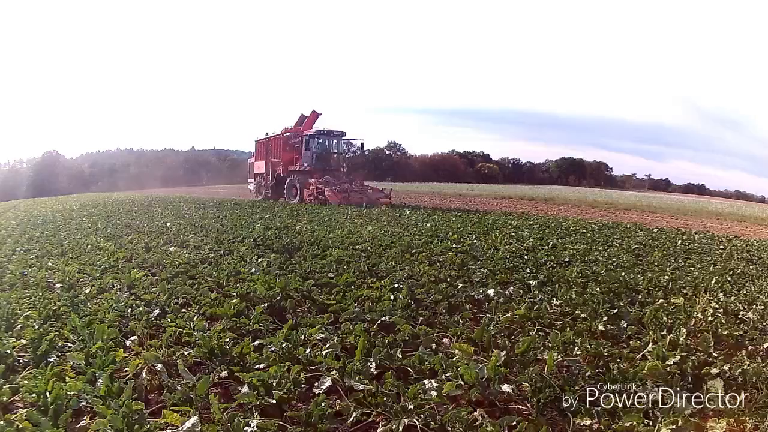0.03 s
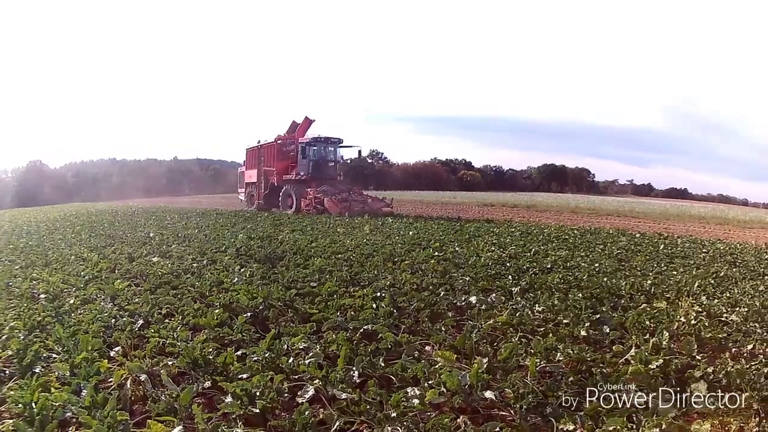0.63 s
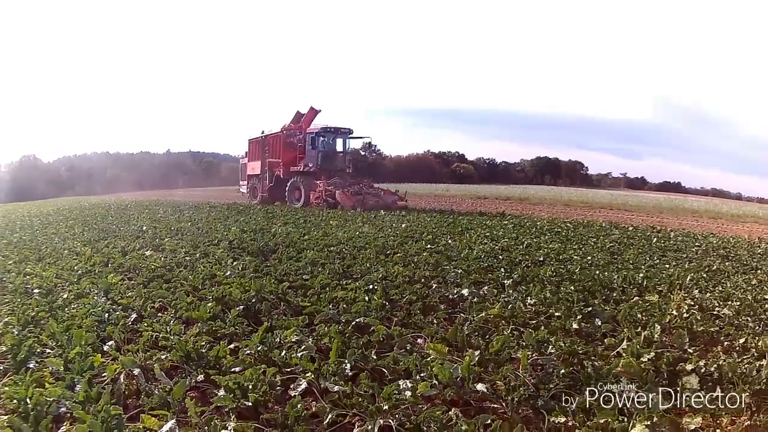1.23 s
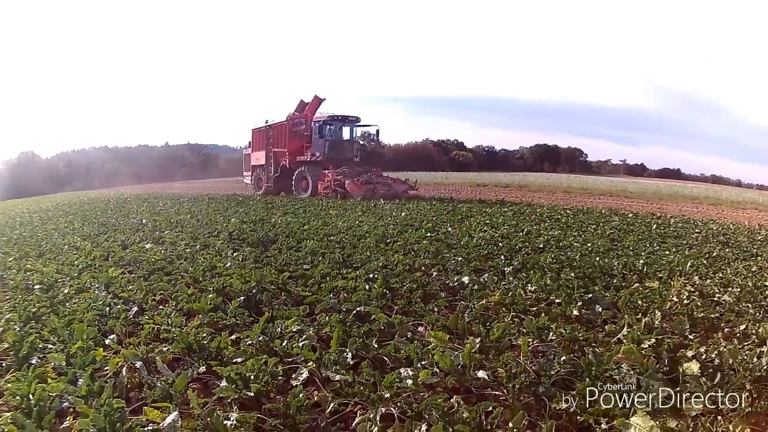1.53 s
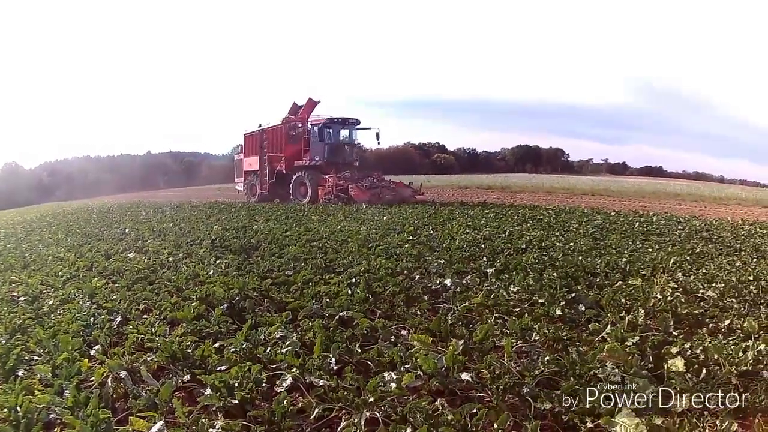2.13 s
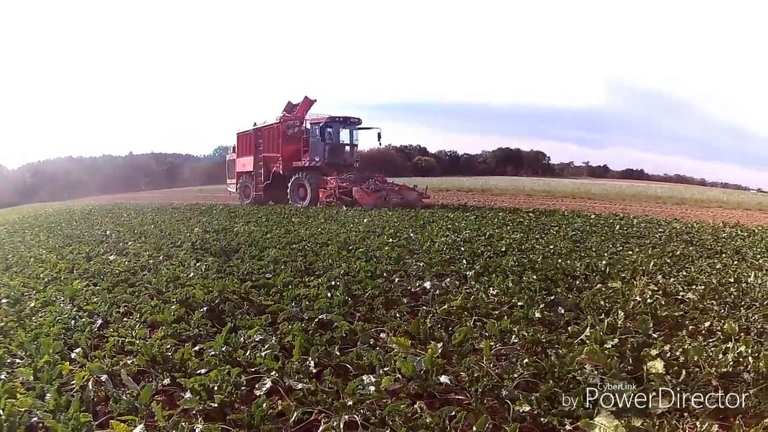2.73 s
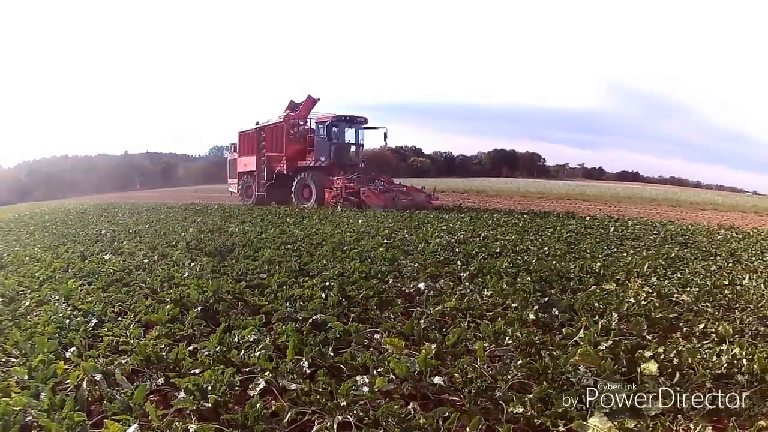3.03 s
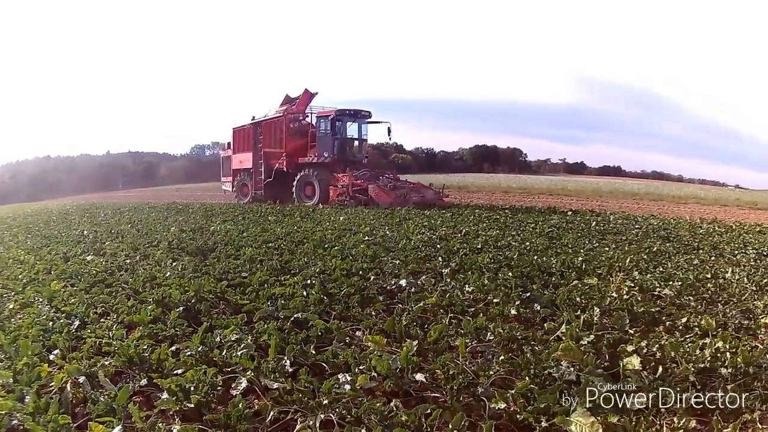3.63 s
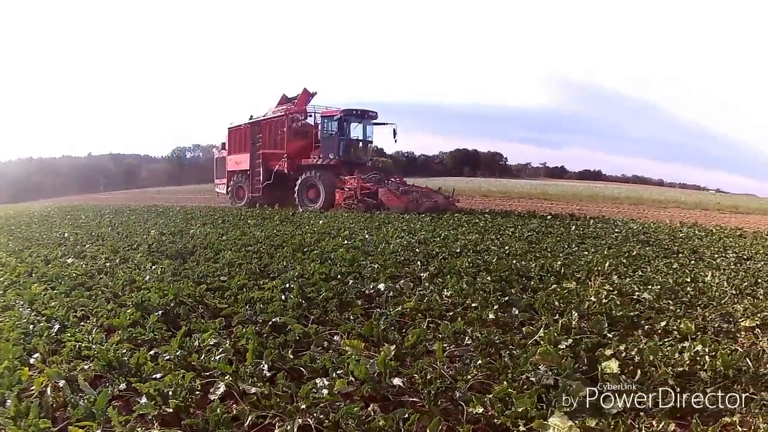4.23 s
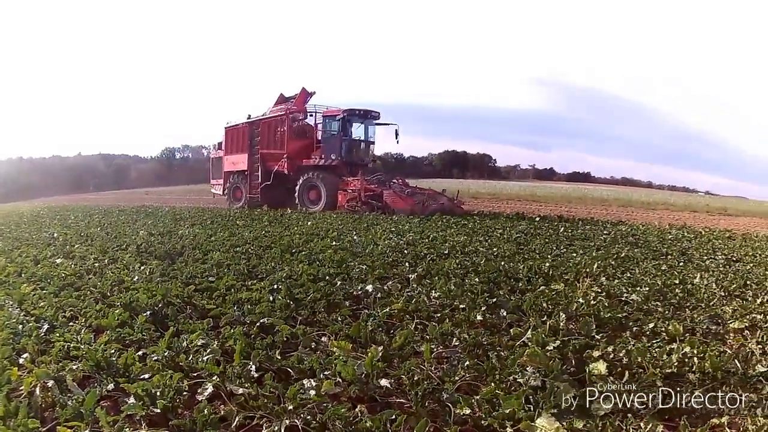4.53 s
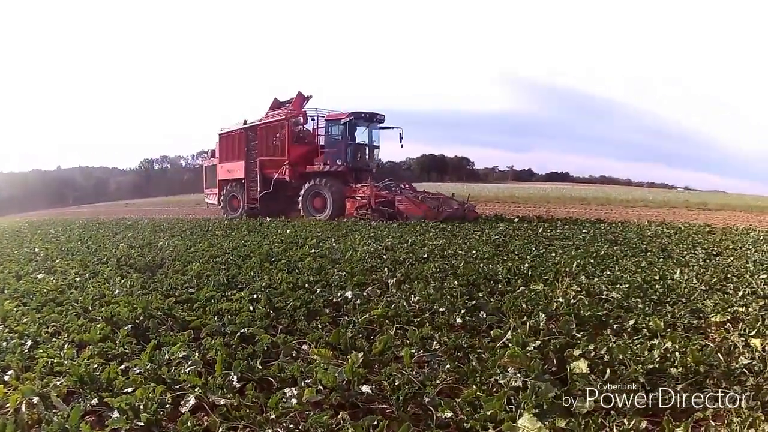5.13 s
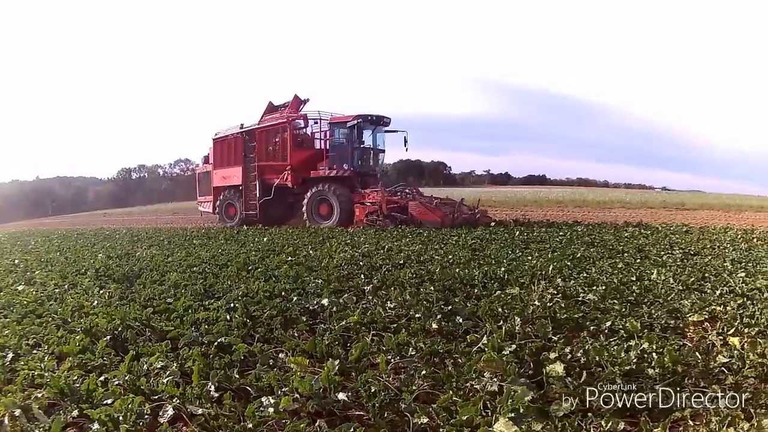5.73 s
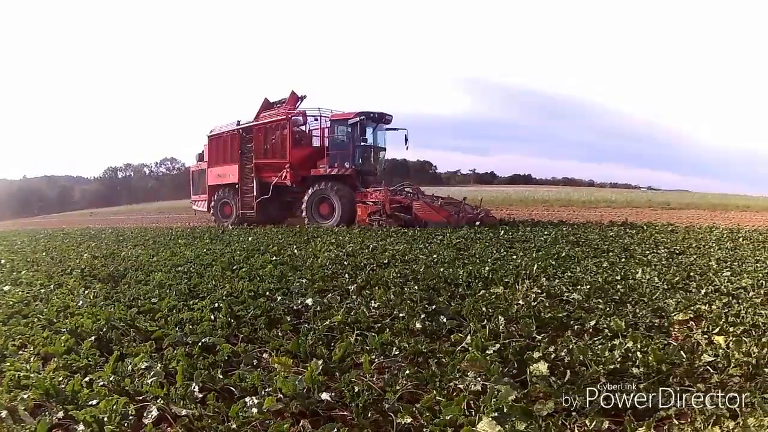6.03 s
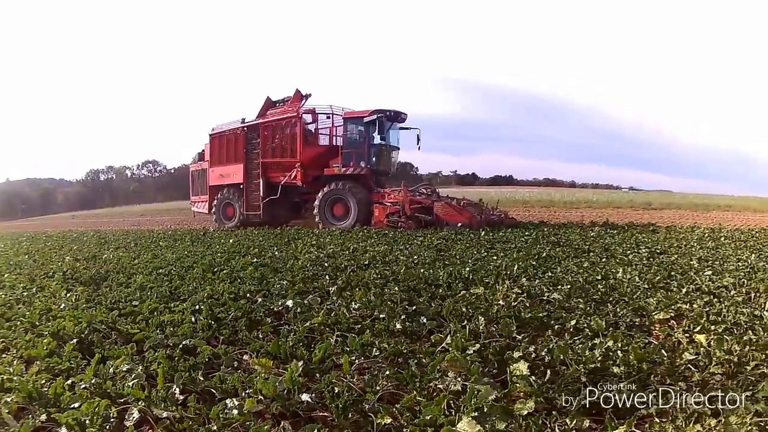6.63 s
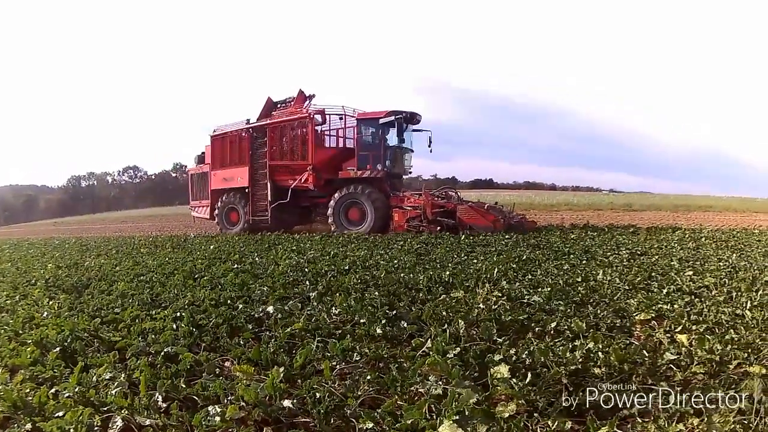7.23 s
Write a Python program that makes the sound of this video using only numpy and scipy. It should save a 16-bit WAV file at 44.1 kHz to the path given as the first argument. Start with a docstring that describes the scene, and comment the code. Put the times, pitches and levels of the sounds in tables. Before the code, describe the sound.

A beet harvester draws nearer, its diesel droning over churning and rattling machinery, with early microphone handling bumps and light wind.

```python
"""Beet harvester drawing near

A beet harvester works its way across a field towards a small hand-held camera. Its diesel drones,
pump and gears whine, beets churn through the lifting gear and stones clink in the rattling sieve chains.
Early on, fingers click, rub and bump on the camera case; light wind rumbles on the microphone."""
import sys
import numpy as np
from scipy import signal
from scipy.fft import rfft, irfft, next_fast_len
from scipy.io import wavfile

SR = 44100
rng = np.random.default_rng(int(sys.argv[2]) if len(sys.argv) > 2 else 0)


def inscribe(sig):
    """Save sig as 16-bit PCM at rate SR to the path in sys.argv[1].

    A 1-D sig is mono; a 2-D sig holds one channel per row.
    Samples are clipped to [-1, 1] before scaling.
    """
    pcm = np.round(np.clip(np.atleast_2d(sig).T, -1, 1) * 32767)
    wavfile.write(sys.argv[1], SR, pcm.astype(np.int16))


N = 321489
TIME = np.arange(N) / SR
START_S = 0.1035   # silence until here


def from_db(db):
    """Decibels to gain."""
    return 10 ** (np.asarray(db) / 20)


def rms_one(x):
    """Scale to unit rms."""
    return x / np.sqrt(np.mean(x ** 2) + 1e-20)


def automation(points):
    """Join (time, value) breakpoints with straight lines, at every sample."""
    return np.interp(TIME, *np.transpose(points))


def butter(x, hz, kind, order=2):
    """Causal low- or high-pass."""
    return signal.sosfilt(signal.butter(order, hz, kind, fs=SR, output="sos"), x + 1e-18)


def drift(rate_hz):
    """Smooth random modulation of unit rms, rolling off above the given rate."""
    hop, settle = 40, 2000
    pole = np.exp(-2 * np.pi * rate_hz * hop / SR)
    noise = rng.standard_normal(N // hop + settle + 2)
    slow = signal.lfilter([1], [1, -2 * pole, pole * pole], noise)[settle:]
    return np.interp(np.arange(N) / hop, np.arange(len(slow)), rms_one(slow))


def coloured(x, spectrum):
    """Shape a steady excitation with an EQ curve; unit rms."""
    hz, level_db = np.transpose(spectrum)
    size = next_fast_len(N)
    bins_hz = np.maximum(np.arange(size // 2 + 1) * SR / size, 1)
    gain = from_db(np.interp(np.log(bins_hz), np.log(hz), level_db, left=-100, right=-100))
    return rms_one(irfft(rfft(x, size) * gain, size)[:N])


def ring(x, hz, t60):
    """One resonance: a unit click sets off a decaying sine of height 1."""
    r, w = from_db(-60 / (t60 * SR)), 2 * np.pi * hz / SR
    return signal.lfilter([0, np.sin(w)], [1, -2 * r * np.cos(w), r * r], x + 1e-18)


def angle(hz):
    """Phase of something turning at a changing rate."""
    return 2 * np.pi * np.cumsum(hz) / SR + rng.uniform(0, 2 * np.pi)


def tone(hz, level_db, fade_db=0.0, fade_hz=2.4):
    """A machine tone; fade_db lets it swell and fade as the air moves over the field."""
    fading = from_db(fade_db * 2 * np.tanh(drift(fade_hz) / 2))   # swells stay bounded
    return np.sqrt(2) * from_db(level_db) * rms_one(fading) * np.sin(angle(hz))


def impacts(per_s, spread_db):
    """A random hail of contacts of uneven strength; unit rms."""
    sizes = from_db(spread_db * np.minimum(rng.exponential(1, N), 4)) * rng.choice([-1, 1], N)
    return rms_one(sizes * (rng.random(N) < per_s / SR))


def stroke(start_s, length_s, attack_s, release_s):
    """Envelope of a hand movement: it builds up, holds and dies away."""
    age = TIME - start_s
    return np.clip(age / attack_s, 0, 1) * np.exp(-np.maximum(age - length_s, 0) / release_s)


def wind():
    """Light wind buffets the microphone with a lumpy, low rumble."""
    # gusts and lulls: (time [s], level [dB])
    gusts = [(0.1, -52), (1.9, -49.5), (3.3, -56), (3.8, -50.5), (6.4, -57.5), (7.2, -49)]
    # colour of the buffeting: (frequency [Hz], relative level [dB])
    wind_eq = [(10, -12), (18, 0), (35, -2.5), (60, -8.5), (100, -9.5), (250, -45)]
    return from_db(automation(gusts) + 2.6 * drift(14)) * coloured(rng.standard_normal(N), wind_eq)


def case(force):
    """The plastic camera case rings with whatever touches it."""
    # case resonances: (frequency [Hz], gain [dB], t60 [s])
    modes = [(73.6, -9, 0.075), (370, -6, 0.022), (620, 3.5, 0.011), (1126, 2, 0.012), (1600, -5.5, 0.011),
             (2220, -3.5, 0.0074), (2500, -1.5, 0.0084), (3070, -1, 0.0096), (4300, -4, 0.0047),
             (5130, -10, 0.006), (6340, -8, 0.0024)]
    return sum((-1) ** k * from_db(db) * ring(force, hz, t60) for k, (hz, db, t60) in enumerate(modes))


def case_clicks(chatter_db=-16, chatter_s=0.0024, thud_db=7):
    """The case snaps under the grip with a small thud and chatters for a few milliseconds."""
    # snaps: (time [s], strength [dB], low-pass cutoff [Hz])
    clicks = [(0.1041, -32.5, 4940), (0.132, -32, 4960), (0.1574, -31.5, 5000), (0.2416, -31.5, 5000),
              (0.2797, -32.5, 5000), (0.5655, -36, 900), (0.668, -33.5, 4500), (1.0400, -28.5, 650)]
    force, snaps = np.zeros((2, N))
    age = np.arange(SR // 50) / SR
    for s, db, bright_hz in clicks:
        grit = butter(rng.standard_normal(len(age)), 1500, "high")
        chatter = from_db(chatter_db) * grit * np.exp(-age / chatter_s)
        at = int(s * SR)
        force[at:at + len(age)] += from_db(db) * butter((age == 0) + chatter, bright_hz, "low", order=1)
        snaps[at] = from_db(db)
    return case(force) - from_db(thud_db) * ring(snaps, hz=90, t60=0.017)


def finger_bumps(creak_db=-32.5, creak_s=0.0033, knock_db=-18, sway_hz=85, sway_share=0.2):
    """A finger presses with a thump and lets go with a knock; a harder press creaks brighter."""
    # presses: (start of release [s], strength [dB], press time [s], release time [s])
    bumps = [(1.540, -29, 0.0049, 0.0025), (1.568, -31, 0.0027, 0.0041), (1.716, -34, 0.0049, 0.0048),
             (1.8960, -29, .001, 0.0033), (1.9103, -18.5, 0.0018, 0.0038), (1.9280, -11, 0.0012, 0.0021),
             (1.9487, -11.5, 0.0012, 0.0019), (1.9968, -15.5, 0.0024, 0.00285),
             (2.1420, 1.5, 0.0053, 0.0018), (2.156, -8, 0.002, 0.0054)]
    # skin creaking on the case: (frequency [Hz], relative level [dB])
    creak_eq = [(400, 8), (700, -6), (1000, 3.5), (1250, -6), (1500, -3), (1900, -10), (2300, -8.5),
                (2580, -6), (2850, -34), (4300, -16.5), (5200, -30), (7000, -37), (9000, -46), (15000, -49)]
    pressure, releases, dull, bright = np.zeros((4, N))
    for s, db, press_s, release_s in bumps:
        pressure -= from_db(db) * np.interp(TIME - s, [-press_s, 0, release_s], [0, 1, 0])
        quickness = 0.002 / release_s   # a slow release is quieter
        from_peak = (TIME - s - .5 * press_s) / (creak_s / 2 + 1.03 * press_s)
        slip = from_db(db + creak_db) * quickness ** 2 / (1 + from_peak ** 4) ** 2
        hardness = min(from_db(db), 1)
        dull += (1 - hardness) * slip
        bright += hardness * slip
        releases[int(s * SR)] = from_db(min(db, -8)) * quickness   # the shell flexes only so far
    thump = butter(butter(pressure, 1400, "low"), 45, "high")   # the pressure leaks away
    sway = sway_share * ring(thump, sway_hz, t60=.025) * 2 * np.pi * sway_hz / SR   # the mount swings back
    knock = from_db(knock_db) * ring(releases, hz=1080, t60=0.01)
    skin = coloured(rng.standard_normal(N), creak_eq)
    creak = bright * skin + dull * butter(skin, 1500, "low")
    return thump - sway + butter(knock + creak, 8000, "low")


def finger_rub(slide_db=-45.5, slide_rumble_db=-7):
    """One finger slide stirs the middle modes of the case; the shifting grip rumbles."""
    # grip shifts: (start [s], length [s], level [dB])
    shifts = [(0.094, .19, -43), (1.016, .03, -50), (1.478, 0.094, -46), (1.67, .06, -48),
              (1.837, .17, -41.5)]
    slide = from_db(slide_db) * stroke(start_s=1.28, length_s=0.11, attack_s=0.067, release_s=0.023)
    grip = sum(from_db(db) * stroke(s, length, attack_s=0.012, release_s=0.027) for s, length, db in shifts)
    friction = butter(butter(rng.standard_normal(N), 1850, "low", order=4), 1050, "high")
    rumble = butter(butter(rng.standard_normal(N), 90, "low", order=3), 52, "high")
    return slide * rms_one(case(friction)) + (grip + from_db(slide_rumble_db) * slide) * rms_one(rumble)


def approach(start_m=28.3, speed_m_per_s=1.97, alongside_s=6.04):
    """Inverse-distance gain in dB, rising from 0 until the harvester draws level."""
    distance_m = start_m - speed_m_per_s * np.minimum(TIME, alongside_s)
    return 20 * np.log10(start_m / distance_m)


def pebble(level_db=-54, ring_hz=3400, t60=0.036):
    """One small stone knocks at random: (time [s], level [dB], pitch [Hz], t60 [s])."""
    s = rng.uniform(START_S, TIME[-1])
    db = level_db + 7 * rng.uniform(-1, 1)
    octaves = 0.15 * rng.uniform(-0.84, 1)
    return s, db, ring_hz * 2 ** octaves, t60


def stone_clinks(pebble_count=10, band_share=0.16, trim_db=-1):
    """Stones hit the steel sieve bars: dense clusters of modes ring briefly, dulled above 4.7 kHz."""
    # larger stones: (time [s], level before trim and low-pass [dB], pitch [Hz], t60 [s])
    stones = [(0.513, -43, 3560, .04), (1.063, -46, 3500, 0.065), (2.82, -47, 3720, 0.047),
              (2.9434, -48, 3900, .04), (3.178, -46.5, 3520, 0.058), (3.613, -43, 3580, 0.045),
              (3.8535, -46.5, 4000, .17), (4.0718, -49, 3530, 0.18), (4.776, -42, 1800, .06),
              (4.929, -48, 4400, .1), (4.9882, -48, 6300, .044), (5.33, -39.5, 2982, 0.022),
              (6.6096, -48, 4000, 0.18)]
    clinks, age = np.zeros(N), np.arange(SR // 5) / SR
    for s, db, hz, t60 in stones + [pebble() for _ in range(pebble_count)]:
        band = signal.butter(2, hz * np.exp([-band_share, band_share]), "band", fs=SR, output="sos")
        modes = signal.sosfilt(band, rng.standard_normal(SR))[-len(age):]
        clink = rms_one(modes) * from_db(db + trim_db - 60 * age / t60)
        at = int(s * SR)
        clinks[at:at + len(age)] += clink[:N - at]
    return butter(clinks, 4700, "low", order=4)


def lifting_gear(closer_db):
    """Beets and soil pound the steel housings, and chain links rattle in uneven bursts."""
    # low churn of the crop: (frequency [Hz], relative level [dB])
    churn_eq = [(430, -29), (500, -14), (570, -0.5), (680, 1), (860, 1), (940, -2.5), (1040, -6),
                (1170, -0.5), (1300, -7.5), (1410, -12), (1600, -53)]
    # midrange clatter: (frequency [Hz], relative level [dB])
    clatter_eq = [(1300, -26), (1450, -10), (1570, 0), (1680, 0.5), (1780, -4.5), (1880, -3), (2000, -2.5),
                  (2150, -5.5), (2300, -13), (2450, -16), (2600, -17), (3000, -44)]
    # bright sieve chains: (frequency [Hz], relative level [dB])
    chain_eq = [(2400, -22), (2800, -4.5), (3070, 1.5), (3380, -3.5), (3650, 0.5), (4020, 0), (4250, -3),
                (4460, -1.5), (4750, -10.5), (5500, -21.5), (5850, -12.5), (6250, -21), (6700, -20.5),
                (10000, -36)]
    load = drift(15.6)   # the crop comes in lumps, which shake every part at once
    beam_db = 1.5 * np.exp(-((TIME - 4.04) / 0.91) ** 2)   # the chains and clatter sound louder for a while as the lifting gear turns towards the camera
    churn_db = -54.5 + 1.21 * closer_db + 0.4 * load
    churn = from_db(churn_db) * coloured(impacts(per_s=5000, spread_db=1.5), churn_eq)
    clatter_db = -55.5 + 1.28 * closer_db + 0.6 * load + 0.87 * drift(9.8) + .25 * beam_db
    clatter = from_db(clatter_db) * coloured(impacts(per_s=4000, spread_db=1.0), clatter_eq)
    links = impacts(per_s=7000, spread_db=1.0) * from_db(0.63 * load + 1.2 * drift(29))
    chains = from_db(-58.5 + 0.68 * closer_db + beam_db) * coloured(links, chain_eq)
    return churn + clatter + chains


def drive_train(firing_hz, closer_db, swell_db, piston_ratio=1.792, mesh_ratio=10.78, bearing_ratio=13.5):
    """Shafts, hydraulic pump, gearbox and a singing bearing are all geared to the engine."""
    # shaft tones: (multiple of firing rate, level when nearest [dB], pitch wander [Hz])
    shaft_orders = [(.47, -62, 0.64), (.975, -60, 1.98), (1.245, -63, 1.92), (1.45, -63, 1.98),
                    (3.77, -69, 1.48), (4.8, -63, 3.25), (5.95, -65, 4.3), (6.52, -66, 1.6),
                    (11.4, -63, 6.96)]
    # pump tones beside the whine: (multiple of piston rate, level when nearest [dB])
    pump_orders = [(1, -62.5), (2, -66.5), (4, -68.5), (5, -68)]
    # hydraulic whine, coming up as the machine draws near: (time [s], level [dB])
    whine_levels = [(0.1, -68), (4.3, -77), (4.6, -57), (5.55, -62.5), (6.65, -50), (7.29, -56.5)]
    distance_db = closer_db - closer_db.max()
    piston_hz = piston_ratio * firing_hz
    shafts = sum(tone(k * firing_hz + wander * drift(5.29), db + 1.1 * distance_db, fade_db=4.0)
                 for k, db, wander in shaft_orders)
    pump = sum(tone(k * piston_hz, db + distance_db / 2) for k, db in pump_orders)
    whine = tone(3 * piston_hz + 1.546 * drift(7.1), automation(whine_levels), fade_db=0.8)
    gear_mesh = tone(mesh_ratio * firing_hz + 7 * drift(10.3), -63 + swell_db, fade_db=2.5)
    bearing = tone(bearing_ratio * firing_hz + 1.5 * drift(9.6), -63 + distance_db / 2)
    return shafts + pump + whine + gear_mesh + bearing


def diesel(firing_hz, closer_db, swell_db):
    """The exhaust drones and howls over a rumble that puffs with each firing."""
    # exhaust howl on the fourth firing order: (time [s], level [dB])
    howl_levels = [(0.1, -59.5), (1.2, -57), (1.6, -65), (2.3, -56), (3.15, -73), (3.38, -53), (3.7, -59.5),
                   (4.2, -49), (5, -51.5), (5.9, -54), (6.25, -59), (7.29, -55.5)]
    # colour of the engine rumble: (frequency [Hz], relative level [dB])
    rumble_eq = [(30, 8.5), (60, 0), (110, -1), (160, 2), (230, -1.5), (290, -2), (340, -6), (400, -7),
                 (470, -12), (600, -20)]
    howl_db = automation(howl_levels)
    drone = tone(2 * firing_hz, -59 + swell_db, fade_db=5.0)
    howl = tone(4 * firing_hz + 0.94 * drift(10.0), howl_db, fade_db=0.8, fade_hz=4.0)
    fan = tone(4.055 * firing_hz + drift(5), howl_db - 12, fade_db=2)   # the blades beat against the howl
    puffs = rng.standard_normal(N) * (1 + 0.48 * np.cos(angle(firing_hz)))
    rumble = from_db(-53.5 + 0.83 * closer_db) * coloured(puffs, rumble_eq)
    return drone + howl + fan + rumble


def scene():
    """The harvester, the hand on the camera and the wind, in mono."""
    # the governed diesel, sagging under load towards the end: (time [s], firing rate [Hz])
    firing_rates = [(0.1, 147.4), (1.1, 147.8), (2.3, 146.2), (3, 147.7), (3.7, 148.2), (4.6, 147.2),
                    (5.7, 147.1), (6.6, 146.1), (7.29, 144)]
    # slow swells that lift the exhaust drone and gear whine together: (time [s], gain [dB])
    swells = [(0.1, -1.5), (2.5, -5), (3.0, 7), (3.6, -3.5), (4.8, -3.5), (5.7, 3), (7.29, -3)]
    firing_hz, swell_db = automation(firing_rates), automation(swells)
    closer_db = approach()
    engine = diesel(firing_hz, closer_db, swell_db) + drive_train(firing_hz, closer_db, swell_db)
    harvest = lifting_gear(closer_db) + stone_clinks()
    hand = case_clicks() + finger_bumps() + finger_rub()
    return (engine + harvest + hand + wind())[None]


def record(dry, cutoff_hz=15500):
    """The electronics add hiss and a thin whistle; sound starts after a moment and the top is cut."""
    # colour of the hiss: (frequency [Hz], relative level [dB])
    hiss_eq = [(3000, -2), (7000, 0.5), (9000, -1), (12000, -1.5), (15500, -4)]
    # whistle partials: (frequency [Hz], level [dB])
    partials = [(13255, -96), (13337.6, -86), (13420.2, -86), (13502.4, -97)]
    hiss = from_db(-71.5) * coloured(rng.standard_normal(N), hiss_eq)
    whistle = sum(np.sqrt(2) * from_db(db) * np.sin(2 * np.pi * hz * TIME) for hz, db in partials)
    live = (dry + hiss + whistle) * (TIME > START_S)
    return signal.sosfilt(signal.ellip(12, .1, 80, cutoff_hz, fs=SR, output="sos"), live)


dry = scene()
out = record(dry)
inscribe(out)
```